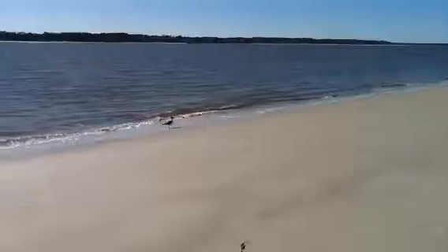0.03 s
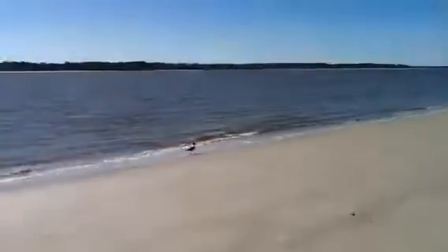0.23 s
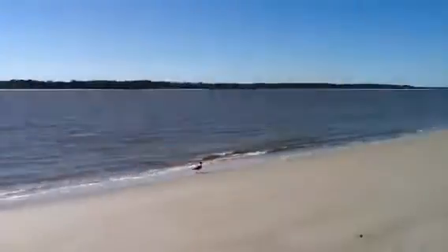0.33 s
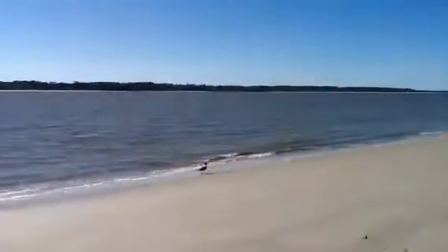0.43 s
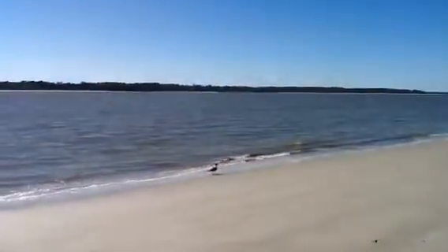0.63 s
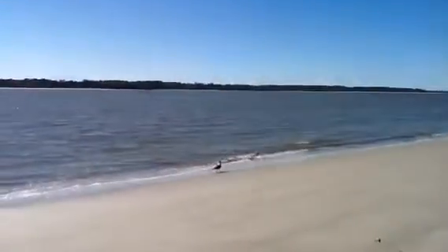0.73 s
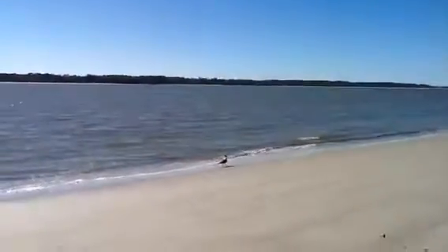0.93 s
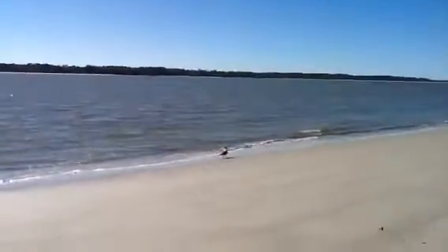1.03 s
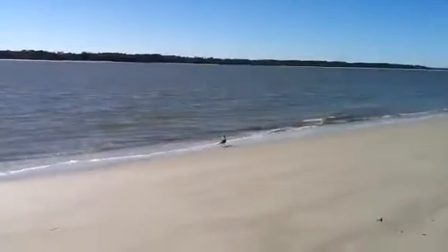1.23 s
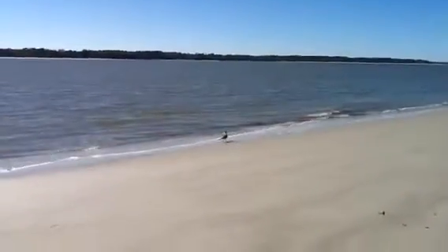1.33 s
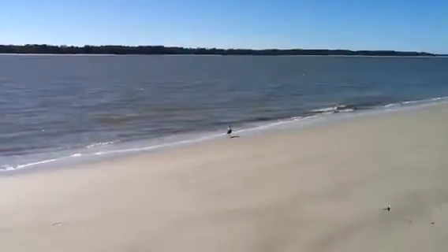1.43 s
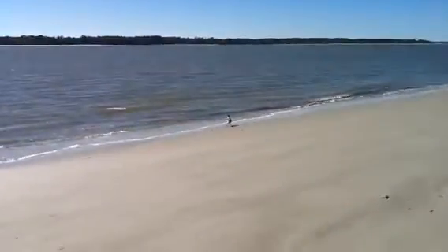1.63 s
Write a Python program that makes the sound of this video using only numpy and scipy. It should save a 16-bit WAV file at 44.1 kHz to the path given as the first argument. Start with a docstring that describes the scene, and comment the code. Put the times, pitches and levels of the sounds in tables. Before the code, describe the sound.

A gust of wind booms and rumbles on the microphone at an open beach and soon eases. Faint, repeated gull calls come through over the soft wash and fizz of low waves, with scattered handling clicks close by.

```python
"""A sandy shore, hand-held camera, microphone in the open wind. Low waves wash and fizz behind.
A gust buffets the microphone and dies down to small puffs; the camera body ticks now and then.
In the distance a gull calls six times, each call an arch in pitch coloured by its throat,
the last two louder. Sound begins a moment in, when the recorder opens."""
import sys
import numpy as np
from scipy.fft import rfft, irfft, next_fast_len
from scipy.io import wavfile
from scipy.ndimage import uniform_filter1d, map_coordinates

SR = 44100
rng = np.random.default_rng(int(sys.argv[2]) if len(sys.argv) > 2 else 0)


def store_wav(level_fs):
    """Save 16-bit WAV to argv[1]."""
    pcm = np.round(np.clip(np.atleast_2d(level_fs), -1, 1) * 32767)
    wavfile.write(sys.argv[1], SR, pcm.T.astype(np.int16))


N = 74970
T = np.arange(N) / SR


def amp(db):
    """Decibels to gain."""
    return 10 ** (np.asarray(db) / 20)


def unit(x):
    """Scale to rms 1."""
    return x / np.sqrt(np.mean(x ** 2) + 1e-20)


def along(points, hz):
    """Read (frequency [Hz], value) points on a log frequency axis."""
    freqs, values = np.transpose(points)
    return np.interp(np.log(hz + 1), np.log(freqs + 1), values)


def curves(rows):
    """One value per sample for each column after the time."""
    times, *columns = np.transpose(rows)
    return [np.interp(T, times, column) for column in columns]


def wobble(per_s):
    """A smooth random curve with per_s knots a second."""
    return map_coordinates(rng.standard_normal(4096), [T * per_s], mode="wrap")


def filtered(x, response):
    """Filter x by a gain given as a function of frequency."""
    size = next_fast_len(N + 8192)
    hz = np.fft.rfftfreq(size, 1 / SR)
    return irfft(rfft(x, size) * response(hz), size)[:N]


def coloured(x, spectrum):
    """x shaped by a spectrum, at rms 1."""
    return unit(filtered(x, lambda hz: amp(along(spectrum, hz))))


def noise(spectrum):
    """Coloured noise of rms 1."""
    return coloured(rng.standard_normal(N), spectrum)


def turbulence(spectrum):
    """Coloured noise that churns quickly but holds its strength over longer spans."""
    churn = noise(spectrum)
    local_power = np.abs(uniform_filter1d(churn ** 2, size=1500))
    return unit(churn / np.sqrt(local_power + .1))


def waves():
    """Low waves in the background: a soft wash, with hissing foam and tiny bursting bubbles on top."""
    # swell of the waves (time [s], wash level [dB], foam level [dB])
    swell = [(.12, -43.5, -62.5), (.4, -43, -60.5), (.6, -44, -61.5), (.88, -44, -59.5), (1.1, -45, -64),
             (1.3, -45.5, -64), (1.55, -43, -63), (1.7, -44.5, -63.5)]
    # spectra of wash and foam (frequency [Hz], relative level [dB])
    wash_spectrum = [(60, -36), (250, 3.5), (500, 2.5), (900, 1), (1700, -0.5), (2700, -7), (4000, -14.5),
                     (5500, -32), (8000, -30), (15000, -31.5)]
    foam_spectrum = [(2000, -13), (4000, 12.5), (6000, 11), (8000, 8), (10000, 2), (13000, -1),
                     (15500, -14)]
    pops_per_s, pop_spread_db, fizz_db = 130, 2.5, -4.5
    wash_db, foam_db = curves(swell)
    wash = noise(wash_spectrum) * amp(wash_db + .46 * wobble(per_s=24.7))
    pops = (rng.random(N) < pops_per_s / SR) * rng.choice([-1, 1], N)
    pop_gain = amp(pop_spread_db * np.minimum(rng.exponential(size=N), 3))
    foam = noise(foam_spectrum) + amp(fizz_db) * coloured(pops * pop_gain, foam_spectrum)
    return wash + foam * amp(foam_db + 1.1 * wobble(per_s=31.15))


def camera_ticks():
    """Dry ticks of the camera body, right by the microphone: a tiny crack around a few cycles of ring."""
    # ticks (time [s], level [dB], ring frequency [Hz])
    ticks = [(0.1532, -36.5, 10600), (0.3872, -31, 5100), (.388, -31.5, 10100), (.4525, -37, 9250),
             (0.5302, -31, 3700), (0.555, -40, 4070), (.593, -38, 4750), (.599, -30, 2370),
             (.6965, -37, 6500), (.740, -39, 6000), (.7764, -40, 6130), (0.7779, -23, 7500),
             (0.7795, -26, 5800), (.7792, -30, 2850), (.7828, -37, 6500), (0.8494, -32.5, 7460),
             (0.8954, -29.5, 3800), (.917, -41.5, 9500), (1.089, -37.5, 4400), (1.1262, -44, 12500),
             (1.1717, -40, 11500), (1.2248, -38, 8500), (1.238, -40, 4300), (1.5274, -32.5, 6640),
             (1.5276, -28.5, 3700), (1.532, -28, 1700), (1.5318, -30, 3600), (1.665, -36.5, 4270)]
    # spectrum of the crack (frequency [multiple of the ring's], relative level [dB])
    crack_spectrum = [(.1, -23), (.5, 19), (1, -17), (1.6, -11), (2.6, -24), (6, -47)]
    base_t60_s, ring_cycles = .001, 7.8
    crack_t60_s, crack_gain = .002, .63
    out = np.zeros(N + SR)
    t = np.arange(1024) / SR
    for start, db, hz in ticks:
        ring_t60_s = base_t60_s + ring_cycles / hz
        ring = np.sin(2 * np.pi * hz * t) * amp(-60 * t / ring_t60_s)
        spectrum = [(ratio * hz, level) for ratio, level in crack_spectrum]
        crack = noise(spectrum)[:len(t)] * amp(-60 * t / crack_t60_s)
        out[round(start * SR):][:len(t)] += amp(db) * (ring + crack_gain * crack)
    return out[:N]


def wind():
    """Boom, rumble and a harsher band at the microphone port; eddies shake the harsh band most."""
    # course of the gust in each band, low to high (time [s], level [dB])
    boom_levels = [(.12, -30.5), (.16, -22), (.215, -29), (.24, -24), (.3, -27), (.38, -26), (.46, -26.5),
                   (.495, -36.5), (.545, -33.5), (.6, -44), (.63, -35), (.765, -34.5), (.8, -41.5),
                   (.88, -40.5), (.97, -40), (1.07, -43.5), (1.137, -39.5), (1.195, -41.5), (1.32, -42.5),
                   (1.37, -35.5), (1.41, -41.5), (1.56, -46), (1.7, -45)]
    rumble_levels = [(.12, -28.5), (.16, -20.5), (.21, -25.5), (.235, -17.5), (.27, -25), (.3, -21),
                     (.435, -26), (.47, -32), (.59, -29), (.64, -31), (.76, -28.5), (.79, -38.5),
                     (.815, -33.5), (.845, -43), (.99, -41.5), (1.02, -42.5), (1.11, -41.5), (1.21, -40),
                     (1.34, -44.5), (1.42, -45.5), (1.575, -48), (1.623, -43), (1.7, -47.5)]
    harsh_levels = [(.12, -25.5), (.175, -26.5), (.205, -32), (.24, -25), (.28, -33), (.31, -29.5),
                    (.36, -37), (.403, -26), (.46, -38), (.52, -46), (.6, -46), (.64, -50), (.7, -46),
                    (.745, -47), (.777, -42), (.8, -54), (1.15, -59), (1.33, -55), (1.36, -47),
                    (1.385, -57), (1.7, -57)]
    # spectrum of each band (frequency [Hz], relative level [dB])
    boom_spectrum = [(25, -32), (50, -36), (70, -19), (100, -11), (130, -1.5), (165, 2), (195, 3.5),
                     (235, -8), (400, -67)]
    rumble_spectrum = [(100, -67), (170, -26), (215, 1.5), (285, -2), (340, -5.5), (420, -8), (520, -13.5),
                       (700, -18.5), (2000, -86)]
    harsh_spectrum = [(150, -39), (330, -2.5), (480, -2), (670, -4.5), (850, -10), (1150, -14), (1500, -29),
                      (2500, -41.5), (6000, -66)]
    rumble_shake_db, harsh_shake_db = .9, 2.3
    boom_db, = curves(boom_levels)
    rumble_db, = curves(rumble_levels)
    harsh_db, = curves(harsh_levels)
    eddies = wobble(per_s=69.48)
    boom = turbulence(boom_spectrum) * amp(boom_db)
    rumble = turbulence(rumble_spectrum) * amp(rumble_db + rumble_shake_db * eddies)
    harsh = turbulence(harsh_spectrum) * amp(harsh_db + harsh_shake_db * eddies)
    return boom + rumble + harsh


def puffs():
    """Each strong eddy hits the microphone as a thump of a few swings."""
    # strong eddies (time [s], envelope peak [dB], pitch [Hz])
    eddies = [(0.1262, -14, 327), (0.162, -14.5, 185), (.176, -16, 670), (.241, -20, 217), (.263, -19, 306),
              (.403, -26, 845), (.441, -19, 288), (.778, -36, 890), (0.924, -25.5, 185), (1.026, -24, 200),
              (1.359, -30.5, 480)]
    width_cycles = .95
    out = np.zeros(N)
    for centre, db, hz in eddies:
        cycles = (T - centre) * hz
        envelope = np.exp(-.5 * (cycles / width_cycles) ** 2)
        out += amp(db) * envelope * np.sin(2 * np.pi * (cycles + rng.random()))
    return out


def gull():
    """A distant gull: each call climbs, tips over and drops, dulling as it goes; wind makes it flicker."""
    # calls (start [s], rise [s], fall [s], top pitch [Hz], starting pitch [share of the top],
    # level [dB], lift of the high overtones [dB])
    calls = [(.517, .035, .018, 895, .92, -51, -3), (.714, .088, .026, 998, .85, -51.5, -3),
             (.954, .063, .026, 1030, .87, -52, 0), (1.168, .075, .04, 1026, .87, -52, 6),
             (1.396, .075, .054, 1028, .895, -47.7, -1), (1.658, .08, .05, 1025, .905, -42.7, -9)]
    # throat resonances, favouring the second harmonic (frequency [Hz], gain [dB])
    throat = [(900, -18), (1850, 0), (2050, 0), (2900, -10), (3900, -24), (4700, -19), (6000, -28),
              (8000, -42)]
    rise_bend, drop_share, jitter_share, edge_s = .643, .14, .005, .008
    shimmer_db, flicker_db, dulling_db_per_s = 1.8, 3, 55
    out = np.zeros(N)
    for start, rise, fall, top_hz, start_share, db, lift_db in calls:
        t = T - start
        rising = np.sin(np.pi / 2 * np.clip(t / rise, 0, 1))
        falling = np.clip((t - rise) / fall, 0, 1)
        climb = rise_bend * rising ** 2 + (1 - rise_bend) * rising
        arch = start_share + (1 - start_share) * climb - drop_share * falling ** 2
        hz = top_hz * arch * (1 + jitter_share * wobble(per_s=300))
        phase = 2 * np.pi * np.cumsum(hz) / SR
        harmonics = [amp(along(throat, k * hz)) * np.sin(k * phase) for k in range(1, 8)]
        high_db = lift_db - dulling_db_per_s * np.maximum(t, 0) + flicker_db * wobble(per_s=60.4)
        voice = sum(harmonics[:3]) + amp(high_db) * sum(harmonics[3:])
        envelope = np.clip(np.minimum(t, rise + fall - t) / edge_s + .5, 0, 1)
        out += np.sqrt(2) * voice * envelope * amp(db + shimmer_db * wobble(per_s=80))
    return out


def scene():
    """Wind, waves, gull and ticks meet at one microphone in the open air."""
    return (wind() + puffs() + waves() + gull() + camera_ticks())[None]


def record(dry):
    """The recorder opens abruptly and keeps nothing above its band limit."""
    open_s, top_hz, rolloff_hz = .12, 15600, 200
    opened = dry[0] * (T >= open_s)
    return filtered(opened, lambda hz: np.clip((top_hz - hz) / rolloff_hz, 0, 1))[None]


dry = scene()
out = record(dry)
store_wav(out)
```